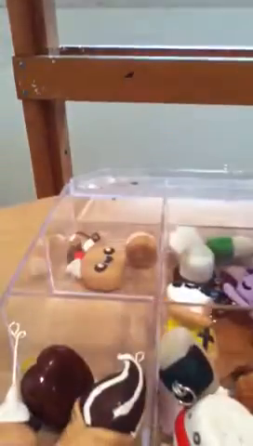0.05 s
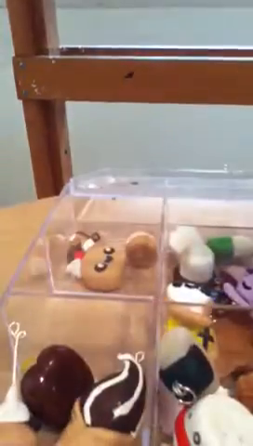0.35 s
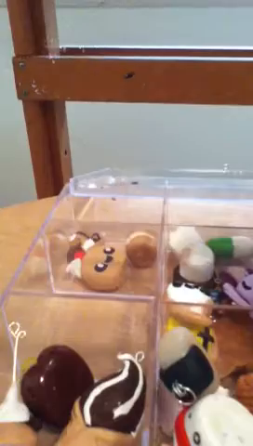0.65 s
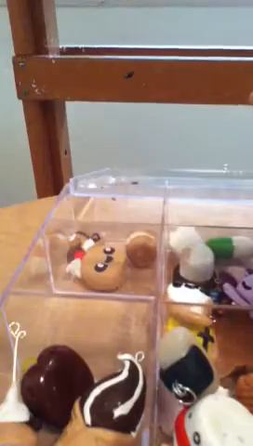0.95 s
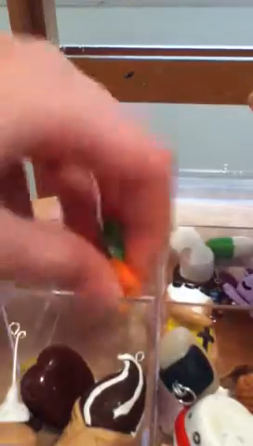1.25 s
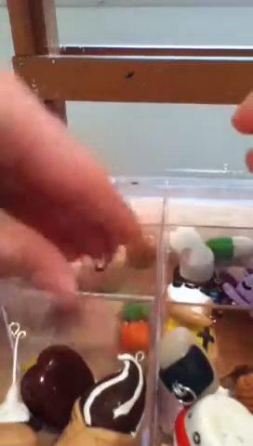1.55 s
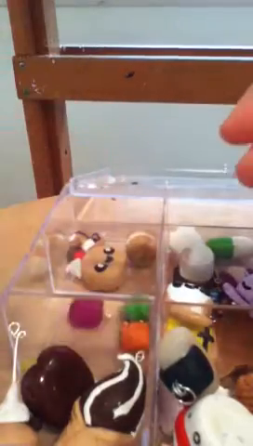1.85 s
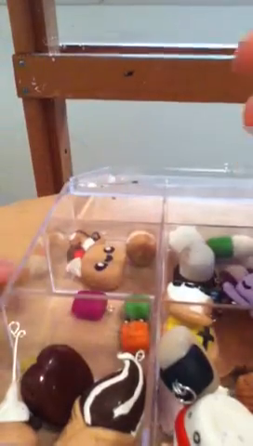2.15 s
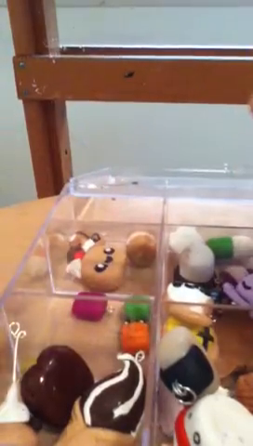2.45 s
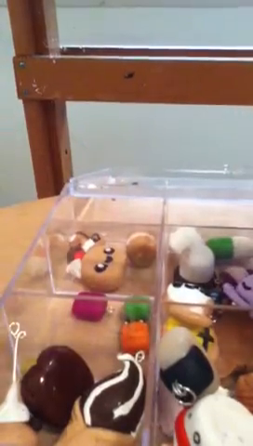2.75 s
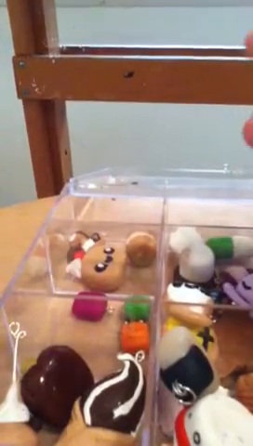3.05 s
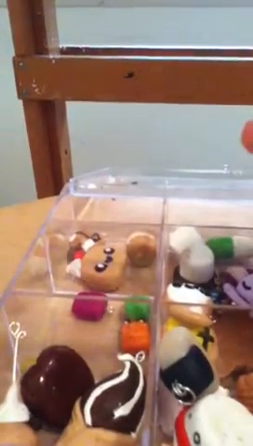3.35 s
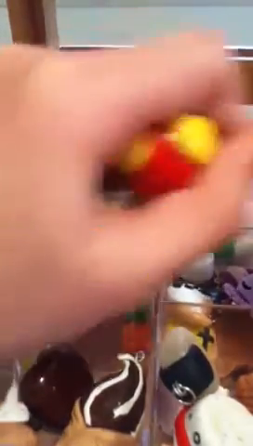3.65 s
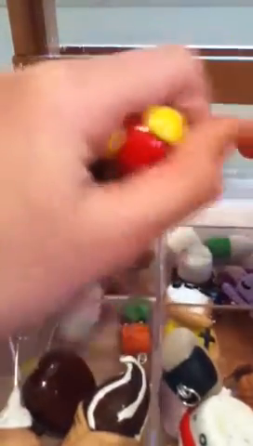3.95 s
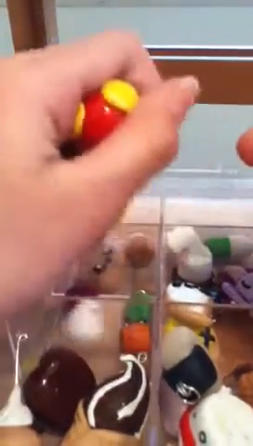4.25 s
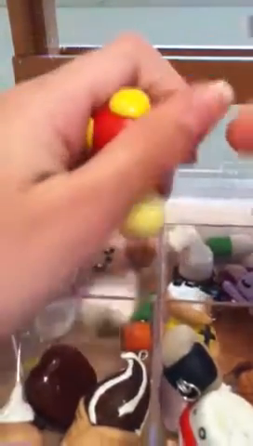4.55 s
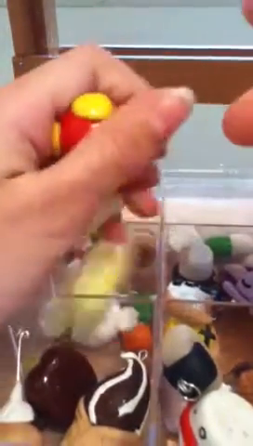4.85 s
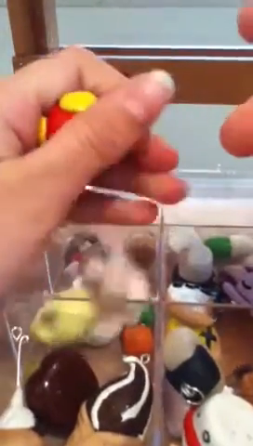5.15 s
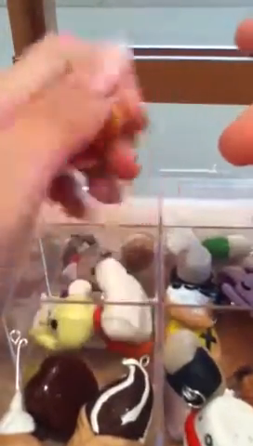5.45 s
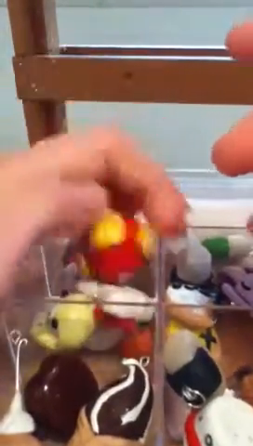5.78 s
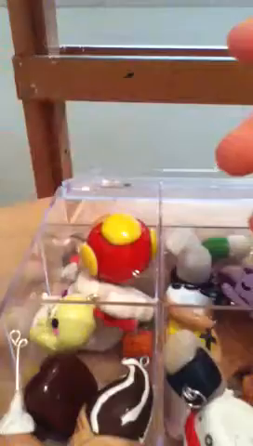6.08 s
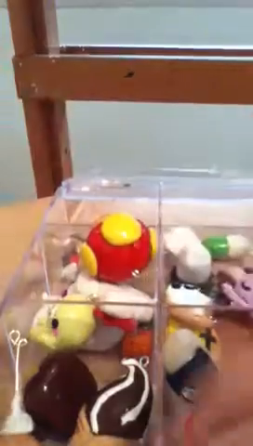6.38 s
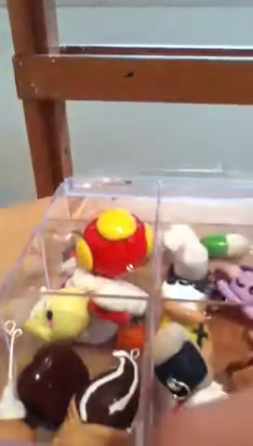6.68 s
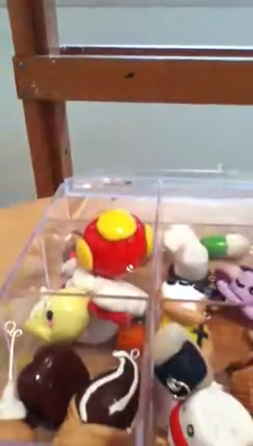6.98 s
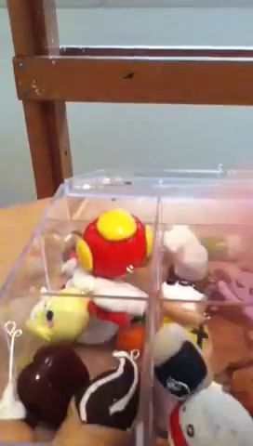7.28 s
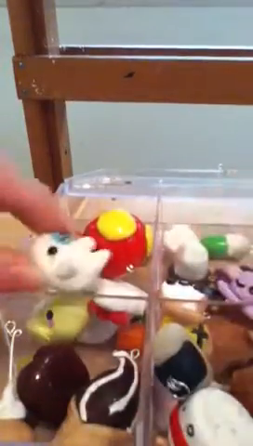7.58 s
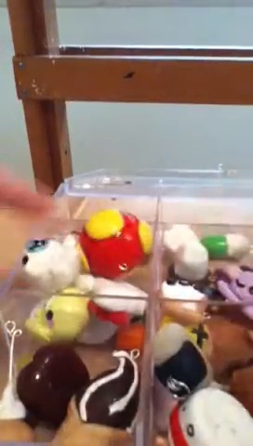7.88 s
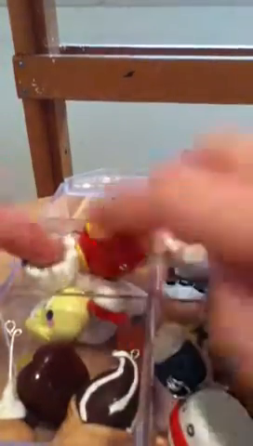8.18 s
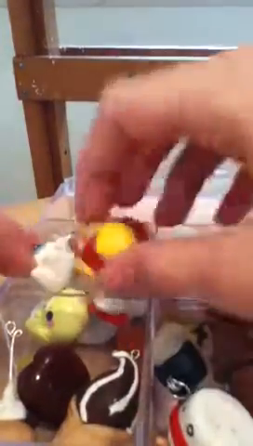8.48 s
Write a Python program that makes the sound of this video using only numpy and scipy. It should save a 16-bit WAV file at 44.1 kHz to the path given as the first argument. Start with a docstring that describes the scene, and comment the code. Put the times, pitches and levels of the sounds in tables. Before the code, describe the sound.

Little clay figures clatter into a plastic box and get nudged around, amid some microphone handling noise and faint hiss.

```python
"""Faint finger knocks on the microphone's housing come first; then clay charms drop, slide and rattle
in a plastic compartment box, close by in a small room. Each contact rings the thin walls and the charm.
Fingers creak and rub on the housing, and the box bumps the table, over hiss and a thin electronic whine.
The recorder's gain control ducks at hard drops and slowly recovers."""
import sys
import numpy as np
from scipy import signal
from scipy.fft import rfft, irfft
from scipy.io import wavfile
from scipy.ndimage import uniform_filter1d, minimum_filter1d

SR = 44100
rng = np.random.default_rng(int(sys.argv[2]) if len(sys.argv) > 2 else 0)


def pcm_store(signal):
    """Save signal as 16-bit PCM."""
    levels = np.round(np.clip(np.atleast_2d(signal), -1, 1) * 32767)
    wavfile.write(sys.argv[1], SR, levels.astype(np.int16).T)


N = 384537
TIME = np.arange(N) / SR
HIT_TIME = TIME[:SR // 15]

# Charms strike the box. Each row: start in seconds, ring in dB, hardness in dB, thud in dB re the ring.
CHARM_CONTACTS = [(1.301,-28.5,-1,-24),(1.3688,-29.5,0,-28),(1.5381,-22,15.5,-18.5),(1.5659,-4.5,3,-42.5),(1.577,-14.5,2,-28),(1.5917,-18,14,-19),
                  (1.595,-19,12,-19),(1.6243,-15.5,12,-31.5),(1.6355,-22,17.5,-29),(1.6459,-18,8,-20.5),(1.6743,-2,4.5,-34),(1.6899,-9,0.5,-33),(1.7317,-10.5,0.5,-30),
                  (1.7528,-12.5,7.5,-39),(1.9969,-9,10,-40.5),(2.0075,-20,5,-26),(2.0257,-17.5,7.5,-34.5),(3.2272,-32,5.5,-35),(3.781,-20,-12.5,-28),(3.8119,-21,-13,-29.5),
                  (3.831,-19,-11.5,-23.5),(4.0742,-7.5,2.5,-22),(4.0871,-28,-5,-11),(4.1111,-7.5,5,-19.5),(4.1195,-15.5,6.5,-13),(4.1577,-12,7.5,-19),
                  (4.1998,-24,9,-9.5),(4.2343,-21.5,-0.5,-27.5),(4.2666,-21,-4,-35),(4.3059,-12,1.5,-21.5),(4.3388,-17.5,3.5,-19.5),(4.3611,-18.5,1,-25),
                  (4.4676,-21.5,-1.5,-25.5),(4.5503,-20.5,-3,-13.5),(4.573,-33.5,3,5.5),(4.6175,-3,-0.5,-17),(4.6612,-18.5,9,-2.5),(4.6888,-20,3,-14.5),
                  (4.6997,-21.5,10,-16.5),(4.755,-20.5,8,-5),(4.9316,-6.5,4.5,-12.5),(4.9945,-13,2,-16.5),(5.0095,-7,-1,-13),(5.0158,-8,1,-13.5),
                  (5.0442,-15,0,-22.5),(5.064,-17.5,-4,-26),(5.0799,-22,0,-10),(5.112,-24,-2,-23.5),(5.2073,-21.5,1,-14.5),(5.2628,-22,3.5,0.5),
                  (5.267,-13,5.5,-16),(5.2985,-23,-3,-21.5),(5.328,-16,-2,-21.5),(5.8233,-31,-11,-15.5),(5.8467,-29,-3,-24),(5.8607,-35,-2,1.5),
                  (5.9026,-21,7,-33),(5.9246,-19.5,1.5,-20),(5.956,-29,-1.5,-19.5),(6.0216,-24.5,4,-27),(6.045,-37.5,-3,-25),(6.2202,-43,-1,-14),(6.2675,-52,12.5,6),(6.4848,-36,11,-41),
                  (6.52,-32.5,10,-32),(6.587,-37.5,14.5,-22),(6.723,-43,7,-10),(6.7982,-56.5,6,3.5),(7.3027,-40.5,5.5,-34),(7.5916,-13.5,-5.5,-16),(7.7953,-37,-16,-7.5),
                  (7.8245,-36,12,-6),(7.9135,-28,0,-7.5),(7.9503,-24.5,-0.5,-10.5),(7.9697,-29,-5,-12.5),(8.2202,-46.5,11,-6),(8.3855,-50.5,22,9.5),
                  (8.4105,-30.5,5.5,-7.5),(8.4778,-26,7,-17),(8.491,-32.5,-2,-11),(8.5078,-48,20.5,-6),(8.554,-24.5,-2.5,-23),(8.6385,-23,2.5,-14),
                  (8.6437,-23.5,4,-11.5),(8.6576,-31.5,20.5,0),(8.6765,-22.5,6,-10.5),(8.708,-26.5,3.5,-8.5)]
# Loose charms settle. Each row: start in seconds, end in seconds, ring level in dB.
CHARM_RATTLES = [(1.596,1.62,-21.5),(1.761,1.795,-23),(1.997,2.065,-26.5),(4.171,4.29,-30),(4.365,4.38,-27.5),(4.47,4.495,-30.5),(4.532,4.57,-30.5),
                 (4.709,4.825,-31.5),(5.016,5.04,-22),(5.868,5.895,-38.5),(8.456,8.475,-36.5),(8.6,8.63,-37.5)]
# Fingers knock on the microphone's housing. Each row: start in seconds, thud in dB, hardness in dB.
FINGER_KNOCKS = [(0.2568,-50.5,5.5),(.3384,-47.5,-0.5),(.646,-54,6.5),(.752,-51,1),(2.3105,-41,3.5),(2.4079,-29,-15),(2.4843,-38,12.5),(2.544,-41.5,8.5),
                 (2.4922,-35.5,4),(2.5809,-39.5,7.5),(2.668,-35.5,0.5),(2.745,-14.5,6.5),(2.783,-15.5,7),(2.83,-21,0.5),(2.8484,-23.5,0.5),(2.8715,-24.5,0),(2.8852,-27,1.5),
                 (3.0486,-40.5,4),(3.1966,-42,-15),(3.3373,-38,-7),(3.4896,-38.5,-14.5),(3.5992,-38.5,-17.5),(3.7342,-37.5,-2),(3.9173,-44.5,4.5),
                 (3.9602,-36.5,-2),(4.0434,-41.5,-5),(6.867,-40.5,-2.5),(6.9246,-45.5,2.5),(6.988,-41,-3)]
# A hit's five bands: thud, ring, ping, snap, sparkle. Each row: low edge in Hz, high edge in Hz.
HIT_BANDS = [(200,1300),(1330,2800),(2650,5600),(5600,9500),(9500,15500)]
# How hits brighten. Each row: relative level in dB, dB added per dB of hardness.
CHARM_TREBLE = [(-5.5,0.8673),(-9.5,1.0),(-19,1.31)]  # ping, snap and sparkle, against the ring
KNOCK_TREBLE = [(-4.5,1.0),(-14.5,1.74),(-21,.7),(-31,1)]  # ring, ping, snap and sparkle, against the thud

# Resonances of box and housing. Each row: frequency in Hz, level in dB, 60 dB decay time in seconds.
BOX_MODES = [(240,-26,0.03),(424.3,-11.5,0.025),(763,-8.5,.016),(1044,-8.5,.016),(1779,-8.5,0.063),(2003,7.5,0.023),(3000,-12.5,0.037),(3476,-2.5,0.03),
             (3853,-4,0.037),(4380,-4.5,0.0074),(6620,-7,0.023),(7430,0,0.017),(8944,-7.5,0.013),(11550,-12.5,0.0077)]
HOUSING_MODES = [(441,-6,0.061),(529,-7.5,0.021),(658,-7.5,0.049),(792,-1.5,0.016),(1034,-12,0.042),(1217,-14.5,0.043),(1414,-17,.03),
                 (1667,-1.5,.035),(1752,-2,0.028),(2220,-5.5,0.048),(2940,-6,0.017),(3290,-5,0.016),(4030,-18.5,0.066)]

# Strokes. Each row: start, strongest moment and end in seconds, then level in dB.
CHARM_SLIDES = [(1.3,1.49,1.83,-43.5),(3.77,3.81,3.91,-29.5),(3.83,3.9,4.1,-46.5),(4.01,4.064,4.14,-39),(4.1,4.125,4.08,-15),(4.14,4.25,4.35,-32.5),
                (4.62,4.7,4.89,-30),(5.48,5.545,5.58,-40),(5.82,5.94,6.34,-48.5),(6.1,6.23,6.33,-43.5),(6.44,6.495,6.61,-30.5),(6.69,6.74,6.98,-52.5),
                (6.93,7.04,7.307,-50),(7.64,7.68,7.9,-50.5),(8.0,8.1,8.3,-38.5),(8.36,8.41,8.43,-32),(8.43,8.495,8.6,-33),(8.61,8.66,8.8,-30)]  # clay dragged over plastic
DIVIDER_BRUSHES = [(6.58,6.612,6.7,-45.5),(6.68,6.712,6.93,-46.5),(6.95,7.04,7.17,-51),(7.1,7.145,7.2,-46.5),(7.19,7.298,6.99,-38)]  # a fingertip along a divider
GRIP_CREAKS = [(.25,.28,0.6,-52),(.6,.66,0.98,-58.5),(2.07,2.1,2.36,-30.5),(2.28,2.5,2.74,-39),(2.85,3.06,3.274,-48.5),(3.76,3.86,3.95,-46.5),(6.76,6.9,7.7,-62.5)]  # fingers gripping the housing
FINGER_RUBS = [(.25,.265,0.37,-53.5),(.4,.435,0.44,-50),(2.38,2.495,2.53,-41.5),(2.52,2.58,2.65,-36),(3.02,3.055,3.115,-45)]  # dry fingertips on the housing
TABLE_BUMPS = [(4.92,5.01,4.7,-42),(5.8,5.87,6,-47),(7.89,7.95,7.96,-51),(8.36,8.41,8.5,-50),(8.6,8.68,8.6,-46)]  # the box pressed on the table

# Tone colours. Each row: frequency in Hz, level in dB.
CRACK_SPECTRUM = [(150,-15.5),(500,-1.5),(1250,0.5),(1900,4.5),(2800,-3),(4200,4),(7500,-5.5),(10500,-4.5),(15000,-18),(16500,-29.5)]
SCRAPE_SPECTRUM = [(300,-24.5),(1100,-15.5),(1500,-6.5),(1900,6),(2600,-17),(3200,-7.5),(3900,-1.5),(5200,-10.5),(7400,-7),(10000,-11),(16000,-33.5)]
RUB_SPECTRUM = [(400,-7),(2000,-0.5),(3300,1),(8000,-9),(16000,-33)]
TABLE_SPECTRUM = [(50,-7),(110,-10.5),(210,0),(450,-9.5),(900,-26.5),(3000,-62.5)]
ROOM_SPECTRUM = [(200,0),(1000,5),(1900,1),(4000,-0.5),(8000,-8.5),(15000,-10)]
HISS_SPECTRUM = [(25,-22.5),(60,-13),(120,-6.5),(330,-10.5),(800,-18.5),(1250,-23.5),(1750,-17),(2400,-25),(7000,-24.5),(15000,-29)]

def charms(contacts, t60, wall_hz=1904, ping_hz=4100, rebound_db=-12.5):
    """Wall, charm and box ring; the contact chatters within milliseconds. Harder is brighter."""
    out = np.zeros(N)
    for start, db, hardness, thud_db in contacts:
        tones = ringing([(wall_hz, 6, t60 * 1.33), (ping_hz, 0, t60)], spread_db=0, detune=.055)
        box = from_db(-8) * ringing(BOX_MODES, spread_db=7, detune=.028)
        hit = tones + box + from_db(3.5) * crack(t60, impulse_db=6)
        rebounds = 0
        for late in rng.random(2):  # later rebounds are weaker
            gain = from_db(rebound_db) * (1 - late / 2) * rng.choice([-1, 1])
            rebounds += gain * np.roll(hit, int(late * .4 * t60 * SR))
        treble_db = [db + offset + slope * hardness for offset, slope in CHARM_TREBLE]
        add_hit(out, start, hit + rebounds, [db + thud_db, db] + treble_db)
    return out

def rattles(gap_s=.016, spread_db=3, thud_db=-17.5):
    """Loose charms settle in weak contacts at uneven intervals."""
    contacts = []
    for start, end, db in CHARM_RATTLES:
        for k, (late, strong, hard) in enumerate(rng.standard_normal((12, 3))):
            when = start + gap_s * (k + .5 + .27 * late)
            if when < end:
                contacts.append((when, db + spread_db * strong, spread_db * hard, thud_db))
    return charms(contacts, t60=.02)

def sliding(full_grit_db=-35.5):
    """Clay sticks and slips over plastic, grittier when pushed hard."""
    push = strokes(CHARM_SLIDES, edge_db=-25)
    hard = np.clip(push / from_db(full_grit_db), 0, 1)
    fine = rms_one(colour(slips(per_s=7000, spread_db=2.7), SCRAPE_SPECTRUM))
    grit = rms_one(colour(slips(per_s=570, spread_db=1.2), SCRAPE_SPECTRUM))
    return push * (fine * (1 - hard / 2) + grit * hard)

def brushing(divider_hz=4050):
    """Skin brushes a divider, which sings in a narrow band."""
    divider = bandpass(slips(per_s=2200, spread_db=0), divider_hz - 210, divider_hz + 210, order=1)
    return strokes(DIVIDER_BRUSHES, edge_db=-33) * rms_one(divider)

def fingers():
    """Handling noise: knocks, creaks and rubs on the microphone's housing, too small for bass."""
    knocks = np.zeros(N)
    for start, db, hardness in FINGER_KNOCKS:
        hit = ringing(HOUSING_MODES, spread_db=4, detune=.0025) + crack(t60=.028, impulse_db=-2.5)
        treble_db = [db + offset + slope * hardness for offset, slope in KNOCK_TREBLE]
        add_hit(knocks, start, hit, [db] + treble_db)
    knocks = signal.sosfilt(signal.butter(2, 360, "high", fs=SR, output="sos"), knocks)
    soft_slips = bandpass(slips(per_s=230, spread_db=3.9), 410, 900, order=2)
    housing = ringing(HOUSING_MODES, spread_db=0, detune=0)
    creak = rms_one(signal.fftconvolve(soft_slips, housing)[:N])
    rub = rms_one(colour(slips(per_s=1500, spread_db=2.5), RUB_SPECTRUM))
    return knocks + creak * strokes(GRIP_CREAKS, edge_db=-14) + rub * strokes(FINGER_RUBS, edge_db=-13.5)

def table_bumps():
    """The table rumbles briefly as the box is pressed on it."""
    return strokes(TABLE_BUMPS, edge_db=-15) * noise(TABLE_SPECTRUM)

def room(x, tail_db=-21, tail_t60=.43, early_db=-14, early_t60=.092):
    """Early reflections and a diffuse tail reach the microphone from 4 ms after the direct sound."""
    t = TIME[:SR // 2]
    response = np.zeros(len(t))
    for db, t60 in (tail_db, tail_t60), (early_db, early_t60):
        echoes = rng.standard_normal(len(t)) * fade(t60, t)
        response += from_db(db) * echoes / np.linalg.norm(echoes)
    return signal.fftconvolve(x, colour(response * (t > .004), ROOM_SPECTRUM))[:N]

def noise_floor(hiss_db=-58, whine_db=-74.5, whine_hz=14994):
    """Steady hiss and a thin electronic whine."""
    whine = from_db(whine_db) * np.sin(2 * np.pi * whine_hz * TIME)
    return from_db(hiss_db) * noise(HISS_SPECTRUM) + whine

def ringing(modes, spread_db, detune):
    """Decaying sines; strength and pitch depend on the spot touched."""
    out = 0
    for k, (hz, db, t60) in enumerate(modes):
        gain = (-1) ** k * from_db(db + spread_db * rng.normal())
        pitch_hz = hz * (1 + detune * rng.normal())
        out += gain * fade(t60) * np.sin(2 * np.pi * pitch_hz * HIT_TIME)
    return out

def crack(t60, impulse_db):
    """A sharp impulse, with dying noise for a crowd of short modes."""
    crowd = rng.standard_normal(len(HIT_TIME)) * fade(t60)
    return colour(crowd + from_db(impulse_db) * (HIT_TIME == 0), CRACK_SPECTRUM)

def add_hit(out, start, hit, levels_db):
    """Place a hit; each band gets its level over the first 10 ms."""
    parts = [bandpass(hit, low, high, order=4) for low, high in HIT_BANDS]
    sound = sum(from_db(db) * part / np.std(part[:SR // 100]) for db, part in zip(levels_db, parts))
    at = int(start * SR)
    out[at:at + len(sound)] += sound[:N - at]

def slips(per_s, spread_db):
    """Stick-slip: random impulses of uneven size."""
    slipping = rng.random(N) < per_s / SR
    size = from_db(spread_db * np.minimum(rng.exponential(1, N), 4))
    return slipping * size * rng.choice([-1, 1], N)

def strokes(rows, edge_db):
    """Each stroke swells and dies away; it is silent unless its end follows its start."""
    return sum(from_db(db + np.interp(TIME, [start, peak, end], [edge_db, 0, edge_db]))
               * (TIME > start) * (TIME < end) for start, peak, end, db in rows)

def noise(spectrum):
    """Coloured noise of rms 1."""
    return rms_one(colour(rng.standard_normal(N), spectrum, size=8192))

def colour(x, spectrum, size=1024):
    """Causal filter with the given spectrum."""
    hz, db = np.transpose(spectrum)
    bins_hz = np.fft.rfftfreq(size, 1 / SR) + 1
    gain = from_db(np.interp(np.log(bins_hz), np.log(hz), db))
    cepstrum = irfft(np.log(gain))
    cepstrum[1:size // 2] *= 2  # fold to minimum phase
    cepstrum[size // 2 + 1:] = 0
    return signal.fftconvolve(x, irfft(np.exp(rfft(cepstrum))))[:len(x)]

def bandpass(x, low_hz, high_hz, order):
    """Keep one frequency band."""
    return signal.sosfilt(signal.butter(order, [low_hz, high_hz], "band", fs=SR, output="sos"), x)

def fade(t60, t=HIT_TIME):
    """Decay by 60 dB in t60 seconds."""
    return from_db(-60 * t / max(t60, .001))

def from_db(db):
    """Decibels to gain."""
    return 10 ** (np.asarray(db) / 20)

def rms_one(x):
    """Scale to rms 1."""
    return x / np.sqrt(np.mean(x ** 2) + 1e-20)

def scene():
    """Box, fingers and table close to one microphone, with the small room behind them."""
    close = charms(CHARM_CONTACTS, t60=.013) + sliding() + brushing() + fingers() + table_bumps()
    background = noise_floor()
    close += rattles()
    return (close + room(close) + background)[None]

def record(dry, limit_db=-13.5, detector_s=.0056, recovery_s=.74, cutoff_hz=16200):
    """The gain drops by the excess over the limit and creeps back; peaks are rounded, the top is cut."""
    window = int(detector_s * SR)
    level_db = 10 * np.log10(np.abs(uniform_filter1d(dry ** 2, window)) + 1e-12)
    excess_db = np.maximum(level_db - limit_db, 0)
    release = np.exp(-TIME / recovery_s)
    cut_db = release * np.maximum.accumulate(excess_db / release, axis=-1)
    held_db = minimum_filter1d(-cut_db, window)
    gain = from_db(uniform_filter1d(held_db, window))
    lowpass = signal.ellip(10, .1, 80, cutoff_hz, fs=SR, output="sos")
    return signal.sosfilt(lowpass, np.tanh(dry * gain))


dry = scene()
out = record(dry)
pcm_store(out)
```